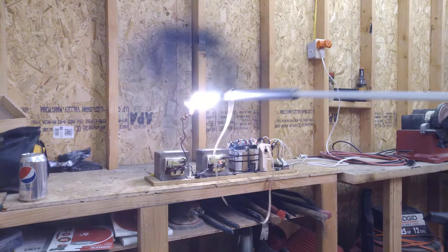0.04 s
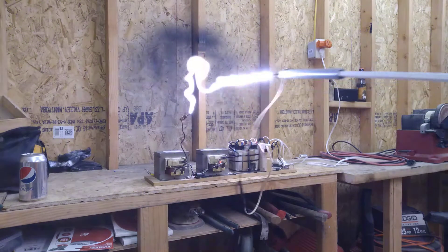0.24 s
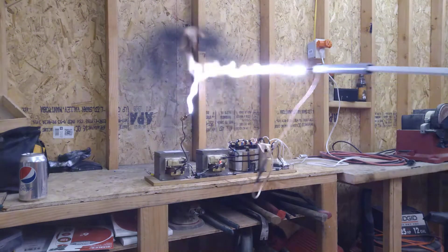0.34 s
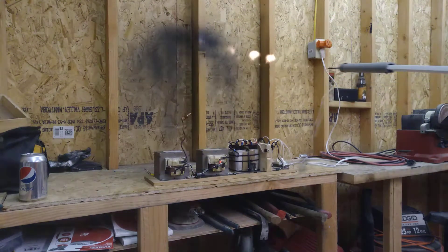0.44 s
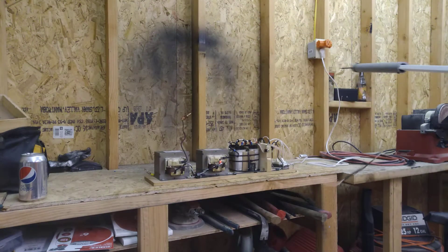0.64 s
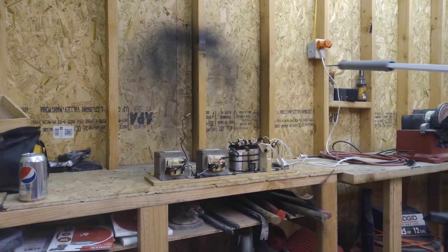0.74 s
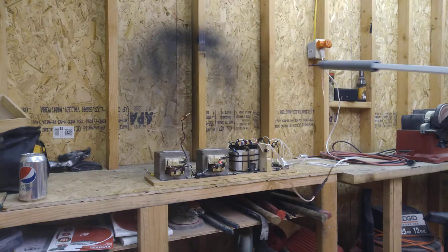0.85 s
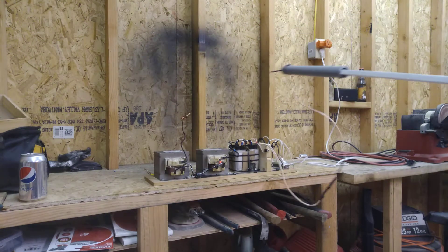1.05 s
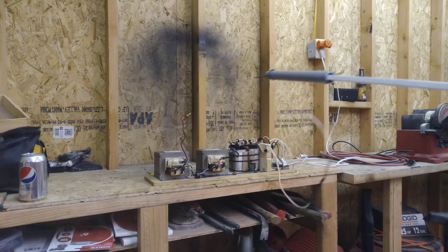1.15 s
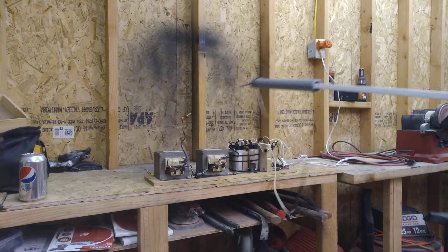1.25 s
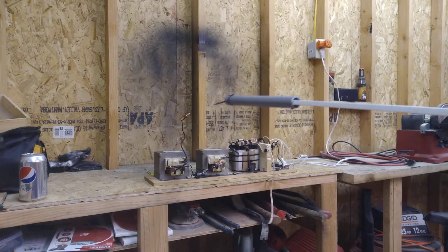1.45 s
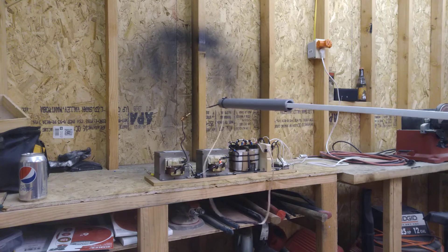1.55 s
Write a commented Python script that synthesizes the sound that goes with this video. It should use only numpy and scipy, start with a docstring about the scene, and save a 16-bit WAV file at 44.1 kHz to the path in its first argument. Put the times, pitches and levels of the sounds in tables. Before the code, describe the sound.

An electric arc buzzes and crackles, cracks loudly and dies, followed by a lighter snap.

```python
"""High-voltage arc in a workshop.

An arc is drawn from mains transformers on the bench of a small wooden workshop. Short, it buzzes and
ticks as it restrikes; stretched, it swells to a deep hum, cracks loudly once and blows out.
A lighter snap follows. The faint drone of idle equipment remains."""
import sys
import numpy as np
from scipy import signal
from scipy.fft import rfft, irfft
from scipy.io import wavfile

SR = 44100
rng = np.random.default_rng(int(sys.argv[2]) if len(sys.argv) > 2 else 0)


def wav_out(sig):
    """Save sig, one row per channel (or a flat mono array), as 16-bit PCM at SR to the path in sys.argv[1]."""
    wavfile.write(sys.argv[1], SR, np.round(np.clip(np.atleast_2d(sig).T, -1, 1) * 32767).astype(np.int16))


N = 70560
T = np.arange(N) / SR
BIN_HZ = np.fft.rfftfreq(N, 1 / SR)

MAINS_HZ, FIRST_STRIKE_S, SNAP_S = 59.8, 0.0103, 0.7932

# Arc envelope: time_s, hum_db, buzz_db, stretch (0-1)
ARC = [(0, -56.5, -55.5, 0.24), (.03, -52.5, -40, 0.05), (.085, -34.5, -31.5, 0.11), (.135, -29, -34, 0.33),
       (.18, -22.5, -30.5, 0.7), (.24, -20.5, -31, 0.93), (.29, -17.5, -28.5, 0.83),
       (.33, -21, -29.5, 0.95), (.42, -18.5, -30, 1)]
# Heat-pulse overtones: multiple of twice the mains rate, short_arc_db, long_arc_db
BUZZ_HARMONICS = [(1.99, 0.5, -8.5), (3, -10.5, 11), (4.32, -5.5, -1), (5.24, -1.5, -5.5),
                  (6.035, -2.5, -11.5), (6.84, -4.5, -12), (7.994, -5.5, -14), (8.93, -6, -16),
                  (9.27, 5, -25), (11.04, -12.5, -24.5), (11.79, -17, -39), (14, -3, -32.5),
                  (14.8, -10.5, -29), (20.7, -20, -38.5)]
# Flame turbulence envelope: time_s, level_db
RASP_ENVELOPE = [(0, -58.5), (.06, -49.5), (.095, -39.5), (.115, -44), (.135, -39), (.2, -35.5), (.26, -50),
                 (.285, -30), (.305, -43), (.35, -37.5), (.42, -39.5)]
# Spark envelopes: time_s, tick_db, sizzle_db
SPARK_ENVELOPES = [(0, -17, -47.5), (.07, -16, -46), (.115, -21, -44.5), (.145, -25, -43.5), (.2, -24, -51),
                   (.25, -31, -50), (.325, -31, -51), (.37, -22, -44.5), (.42, -31, -54.5)]
# Flashovers: start_s, level_db, direct_db, bench_db
FLASHOVERS = [(0.1272, -9, -43, 5), (0.1321, -18, 4.5, 4), (.333, -1, -0.5, 4)]

# Source spectra: freq_hz, relative_db
CRACK_SPECTRUM = [(60, -13), (400, -0.5), (1000, 4), (2000, -3), (3500, -7), (5500, -6.5), (7500, -1.5),
                  (9800, 1.5), (11500, -6.5), (13500, -14), (16000, -16.5)]
RASP_SPECTRUM = [(40, -20), (150, 8), (300, 0.5), (450, 7), (900, 2), (1500, -11.5), (2500, -12.5),
                 (5000, -34), (16000, -47.5)]
POP_SPECTRUM = [(80, -18.5), (500, -6), (1500, -4), (3000, -16), (6000, -30), (16000, -44)]
TICK_SPECTRUM = [(200, -19.5), (2000, -16.5), (6500, -26.5), (8500, 0.5), (10500, 1.5), (12000, -7),
                 (15500, -2)]
SIZZLE_SPECTRUM = [(200, -18.5), (1500, -1.5), (3000, -6.5), (5000, -8), (7500, -6), (9500, -1.5),
                   (10600, 2), (11800, -8), (15500, -5.5)]
SNAP_SPECTRUM = [(100, -26), (300, -20), (800, -5.5), (1600, -9.5), (3000, -1.5), (4600, -5), (6500, 0),
                 (8500, 0.5), (10300, 4), (12000, -5), (14000, -12), (16000, -17)]
BOOM_SPECTRUM = [(100, -29), (250, -3), (500, -2), (850, 1.5), (1300, -9.5), (3000, -30), (16000, -50)]
AIR_SPECTRUM = [(25, -22.5), (50, -19.5), (85, -5), (130, -3), (200, -9), (290, -16), (400, -13.5),
                (600, -14.5), (900, -16), (1300, -21.5), (2100, -22.5), (2800, -21), (5000, -28.5),
                (10500, -27.5), (12000, -36.5), (16000, -37.5)]

# Idle equipment tones: pitch_hz, level_db
DRONE_TONES = [(86.1, -70), (118.9, -77), (171.5, -71), (240.5, -70.5), (360.7, -84), (479.5, -83)]
# Workshop decay: freq_hz, t60_s
ROOM_DECAY = [(150, 1), (400, 0.5), (900, 0.54), (2000, .48), (4000, .46), (8000, 0.38), (11000, 0.34),
              (15000, 0.21)]
# Standing waves: pitch_hz, relative_db, t60_s
ROOM_MODES = [(108.2, -8.5, .36), (123.1, -12.5, .36), (240.5, -7, 0.51), (348.4, -13, 0.44),
              (491, -14.5, 0.28), (595.6, -10.5, .35)]
# Diffuse field, left to right: freq_hz, coherence (0-1)
COHERENCE = [(60, 0.8), (250, 0.8), (500, .65), (900, 0), (1500, 0), (16000, 0)]


def pulse_phase(lead_s=0.0004, stretch_lag_s=0.0017):
    """The arc heats the air twice per mains cycle; a long flame answers the current later."""
    lag_s = stretch_lag_s * curve(ARC, column=3)
    return 2 * np.pi * 2 * MAINS_HZ * (T - FIRST_STRIKE_S + lead_s - lag_s)


def burning(blowout_s=0.43, decay_s=0.018):
    """One while the arc burns, falling fast at blowout."""
    return np.exp(-np.maximum(T - blowout_s, 0) / decay_s)


def pulsed_noise(depth):
    """Noise that flares with each heat pulse."""
    return rng.standard_normal(N) * unit_rms(np.exp(depth * np.cos(pulse_phase())))


def hum():
    """Deep fundamental of the heat pulses."""
    tone = -np.sqrt(2) * np.cos(pulse_phase()) * amp(curve(ARC, column=1)) * burning()
    return pan(-2) * add_modes(tone)


def buzz(jitter_s=0.00005, flutter=0.17, flutter_hz=20):
    """Heat-pulse overtones: sharp in a short arc, rounder as it stretches."""
    multiples, short_db, long_db = np.transpose(BUZZ_HARMONICS)
    stretch = curve(ARC, column=3)
    phase = pulse_phase() + 4 * np.pi * MAINS_HZ * jitter_s * wander(MAINS_HZ)
    tone, power = 0, 0
    for k in range(2, 22):
        gain = amp(np.interp(k, multiples, short_db) * (1.5 - stretch)
                   + np.interp(k, multiples, long_db) * stretch)
        in_phase = (1 + flutter * wander(flutter_hz)) * np.sin(k * phase)
        quadrature = flutter * wander(flutter_hz) * np.cos(k * phase)
        tone -= gain * (in_phase + quadrature)
        power += gain ** 2 / 2
    tone = tone / np.sqrt(power) * amp(curve(ARC, column=2)) * burning()
    upper = signal.sosfilt(signal.butter(2, 550, "high", fs=SR, output="sos"), tone)
    echoes = amp(-7.5) * convolve(upper, bench_ir()) + amp(-3.5) * convolve(upper, room_ir())
    return pan(-0.85) * add_modes(tone) + echoes


def cracks(direct_trim_db=2, bench_trim_db=-0.5, room_db=0.5):
    """Flashovers: one shock each, echoed by bench and room."""
    out = 0
    for start_s, level_db, direct_db, bench_db in FLASHOVERS:
        shock = -amp(level_db) * colour(impulse(start_s), CRACK_SPECTRUM)
        direct = amp(direct_db + direct_trim_db) * shock
        early = amp(bench_db + bench_trim_db) * convolve(shock, bench_ir())
        out += pan(2) * (direct + early) + amp(room_db) * convolve(shock, room_ir())
    return out


def rasp_and_pop(pop_s=0.0937):
    """Turbulent puffs of the flame, and one hard, dull restrike."""
    puffs = colour(pulsed_noise(depth=1.3) * amp(curve(RASP_ENVELOPE)) * burning(), RASP_SPECTRUM)
    pop = -amp(-5.5) * colour(impulse(pop_s), POP_SPECTRUM)
    return place(amp(-3) * (puffs + pop), pan_db=1, bench_db=5, room_db=0)


def restrike_ticks(scatter_db=2):
    """One sharp tick per mains cycle as the arc restrikes."""
    onsets = np.round(np.arange(FIRST_STRIKE_S, 1, 1 / MAINS_HZ) * SR).astype(int)
    strikes = np.zeros(N)
    strikes[onsets] = amp(scatter_db * rng.standard_normal(len(onsets)))
    ticks = colour(strikes * amp(curve(SPARK_ENVELOPES, column=1)) * burning(), TICK_SPECTRUM)
    return place(ticks, pan_db=-3.5, bench_db=-4, room_db=-3)


def sizzle(grain_db=4):
    """Countless tiny sparks that flare with the current."""
    sparks = unit_rms(amp(grain_db * rng.standard_normal(N))) * pulsed_noise(depth=0.7)
    hiss = colour(sparks * amp(curve(SPARK_ENVELOPES, column=2)) * burning(), SIZZLE_SPECTRUM)
    return place(hiss, pan_db=-2, bench_db=3.5, room_db=-0.5)


def snap(rise_s=0.0052, t60_s=0.033, direct_db=-13.5):
    """A lighter snap, heard mostly off the walls."""
    age_s = np.maximum(T - SNAP_S, 0)
    burst = rng.standard_normal((2, N)) * np.minimum(age_s / rise_s, 1) ** 2 * amp(-60 * age_s / t60_s)
    heard = amp(direct_db) * unit_rms(burst) / np.sqrt(N) + convolve(impulse(SNAP_S), room_ir())
    return pan(0.7) * amp(-8.5) * np.array([colour(side, SNAP_SPECTRUM) for side in heard])


def snap_boom(delay_s=0.03, level_db=-22):
    """The snap's low part, back late from the far walls."""
    return amp(level_db) * convolve(colour(impulse(SNAP_S + delay_s), BOOM_SPECTRUM), room_ir())


def drone(waver=0.33, waver_hz=7):
    """Low, wavering tones of idle equipment."""
    out = 0
    for pitch_hz, level_db in DRONE_TONES:
        drift = 1 + waver * (wander(waver_hz) + 1j * wander(waver_hz))
        carrier = np.exp(2j * np.pi * (pitch_hz * T + rng.random()))
        out += amp(level_db) * np.sqrt(2) * (drift * carrier).real
    return out


def room_air(level_db=-67):
    """Faint, steady room noise."""
    air = irfft(rfft(diffuse_noise()) * amp(at_hz(AIR_SPECTRUM, BIN_HZ)), N)
    return amp(level_db) * unit_rms(air)


def place(x, pan_db, bench_db, room_db):
    """Direct sound, early echoes and tail."""
    near = x + amp(bench_db) * convolve(x, bench_ir())
    return pan(pan_db) * near + amp(room_db) * convolve(x, room_ir())


def bench_ir(gap_s=0.0007, t60_s=0.08, echo_s=0.0026, echo_db=-6):
    """Dense early echoes off the bench and the wall behind it."""
    scatter = diffuse_noise() * amp(-60 * T / t60_s) * (T > gap_s)
    return unit_rms(scatter) / np.sqrt(N) + amp(echo_db) * impulse(echo_s)


def room_ir(build_s=0.019, build_corner_hz=1200, fade_in_s=0.0078):
    """Workshop tail: each band decays at its own rate; the bass builds slowest."""
    hz, time_s, bands = signal.stft(diffuse_noise(), SR, nperseg=256)
    build = 1 - np.exp(-time_s * (1 + hz[:, None] / build_corner_hz) / build_s)
    decay = amp(-60 * time_s / at_hz(ROOM_DECAY, hz)[:, None])
    tail = signal.istft(bands * build * decay, SR, nperseg=256)[1][:, :N]
    return unit_rms(tail * np.minimum(T / fade_in_s, 1)) / np.sqrt(N)


def add_modes(x):
    """Adds the room's low standing waves."""
    ir = 0
    for pitch_hz, relative_db, t60_s in ROOM_MODES:
        unity_peak = 2 * np.log(1000) / (t60_s * SR)
        ir += unity_peak * amp(relative_db - 60 * T / t60_s) * np.cos(2 * np.pi * pitch_hz * T)
    return x + 2 * convolve(x, ir)


def diffuse_noise():
    """Stereo noise, alike on both sides in the bass."""
    left, unrelated = rfft(rng.standard_normal((2, N)))
    coherence = at_hz(COHERENCE, BIN_HZ)
    right = coherence * left + np.sqrt(1 - coherence ** 2) * unrelated
    return irfft(np.array([left, right]), N)


def colour(x, spectrum, size=2048):
    """Minimum-phase filter of unit energy."""
    log_gain = np.log(amp(at_hz(spectrum, abs(np.fft.fftfreq(size, 1 / SR)))))
    ir = np.fft.ifft(np.exp(np.conj(signal.hilbert(log_gain)))).real[:size // 2]
    return convolve(x, ir / np.linalg.norm(ir))[0]


def wander(rate_hz):
    """Slow random motion, unit rms."""
    return unit_rms(irfft(rfft(rng.standard_normal(N)) / (1 + (BIN_HZ / rate_hz) ** 4), N))


def curve(table, column=1):
    """A time table's column, per sample."""
    rows = np.array(table)
    return np.interp(T, rows[:, 0], rows[:, column])


def at_hz(table, hz):
    """Table lookup on a log-frequency axis."""
    freq_hz, values = np.transpose(table)
    return np.interp(np.log(hz + 1), np.log(freq_hz), values)


def pan(left_minus_right_db):
    return amp([[left_minus_right_db / 2], [-left_minus_right_db / 2]])


def impulse(time_s):
    return 1.0 * (np.arange(N) == round(time_s * SR))


def convolve(x, ir):
    return signal.fftconvolve(np.atleast_2d(x), np.atleast_2d(ir), axes=1)[:, :N]


def amp(db):
    return 10 ** (np.asarray(db) / 20)


def unit_rms(x):
    return x / np.sqrt(np.mean(x ** 2) + 1e-20)


def scene():
    """Arc, snap and idle workshop."""
    arc = hum() + buzz() + rasp_and_pop() + restrike_ticks() + sizzle() + cracks()
    return arc + snap() + snap_boom() + drone() + room_air()


def record(dry):
    """Steep low-pass at the top of the treble."""
    lowpass = signal.firwin(255, cutoff=15950, window=("kaiser", 8), fs=SR)
    return signal.oaconvolve(dry, lowpass[None], "same")


dry = scene()
out = record(dry)
wav_out(out)
```